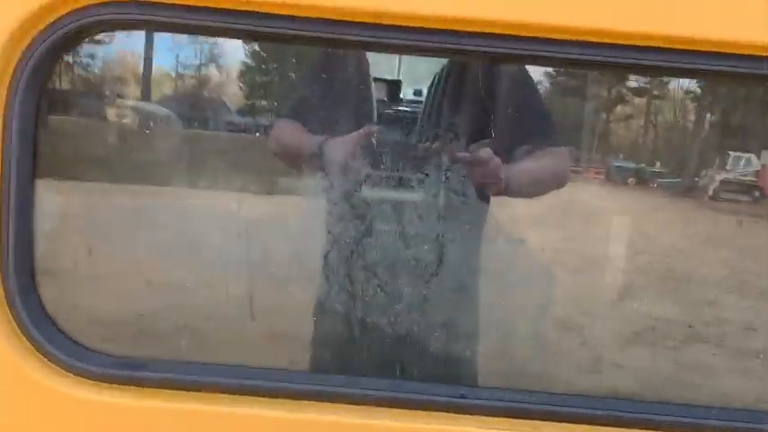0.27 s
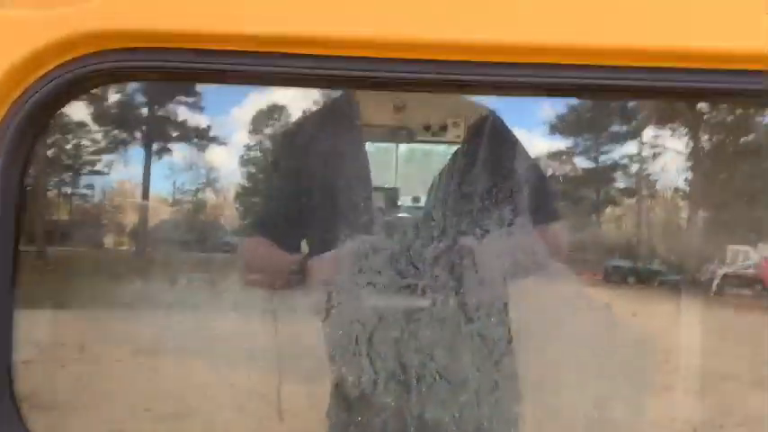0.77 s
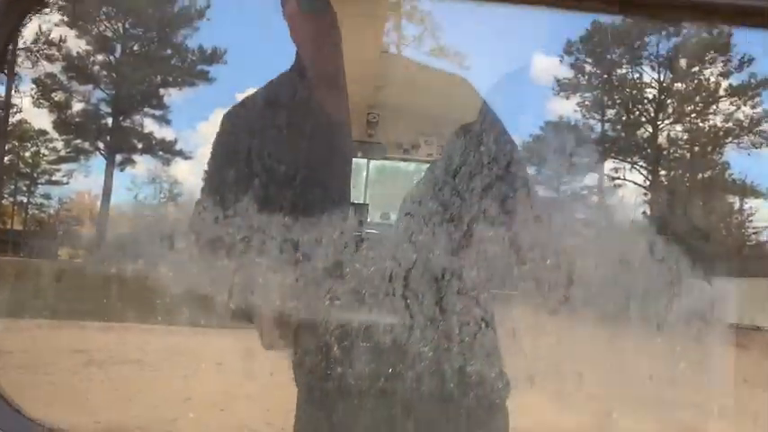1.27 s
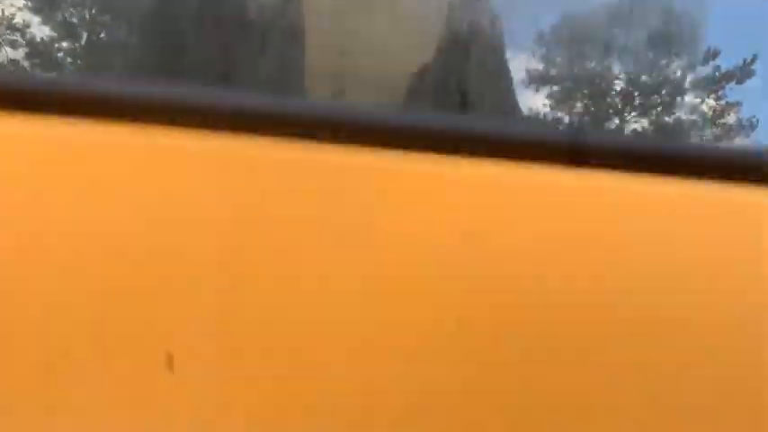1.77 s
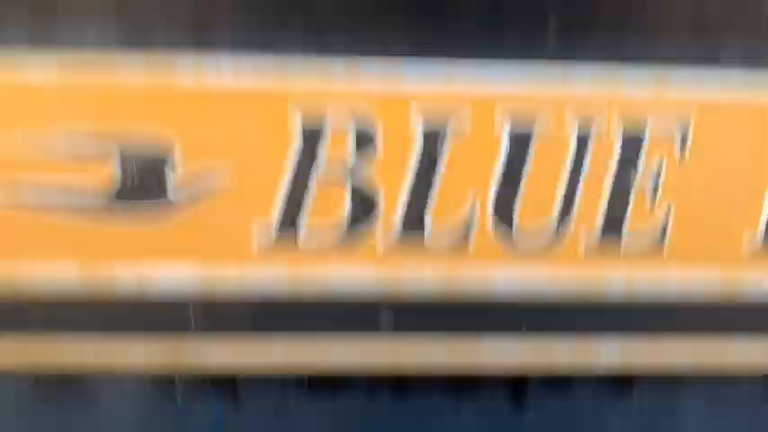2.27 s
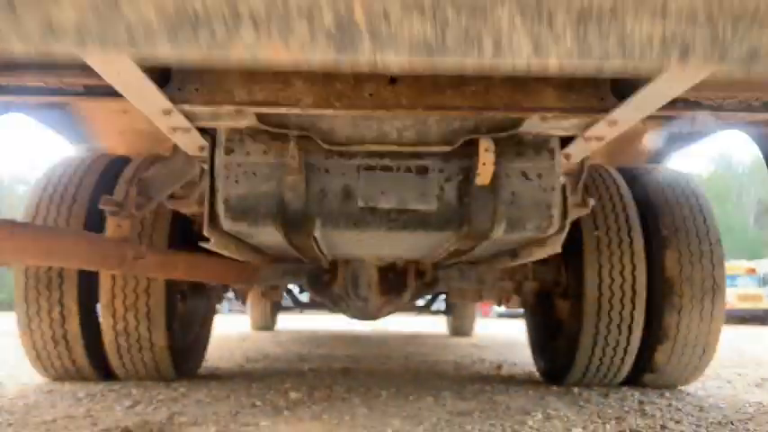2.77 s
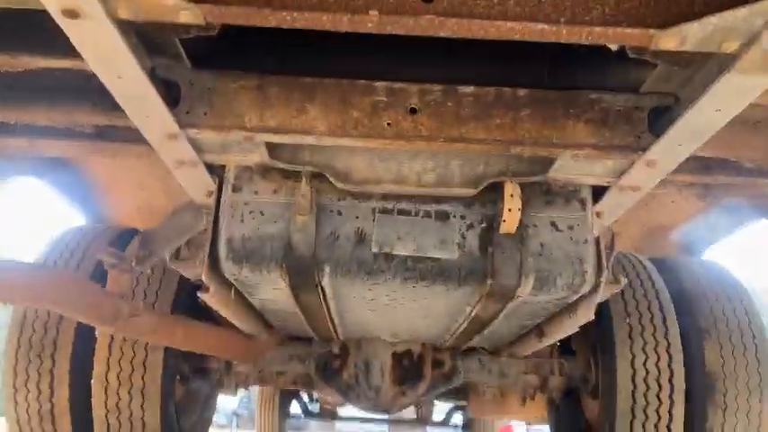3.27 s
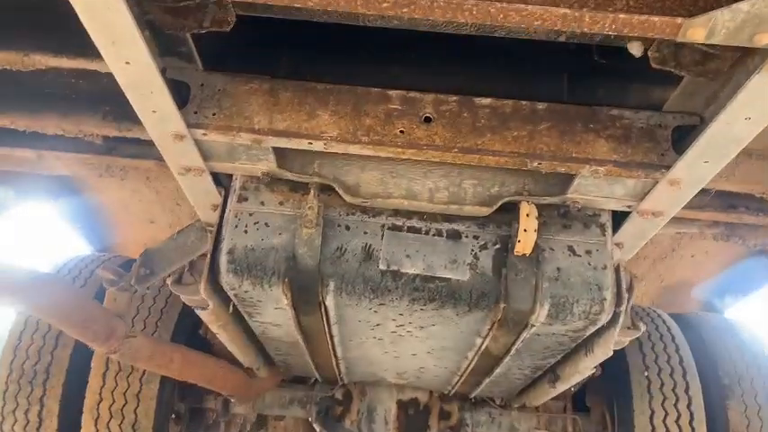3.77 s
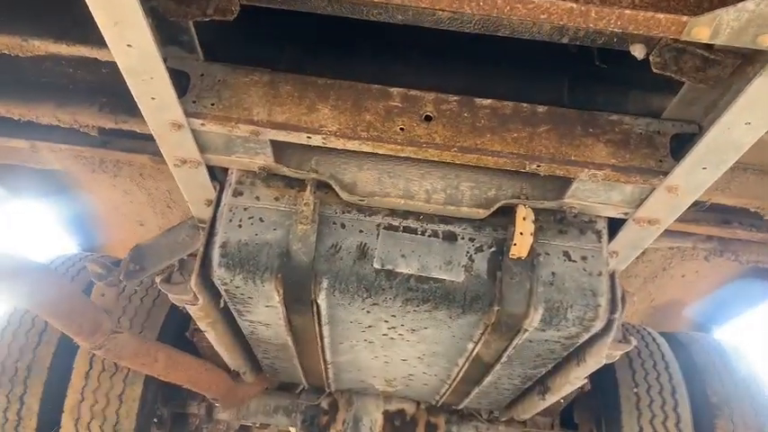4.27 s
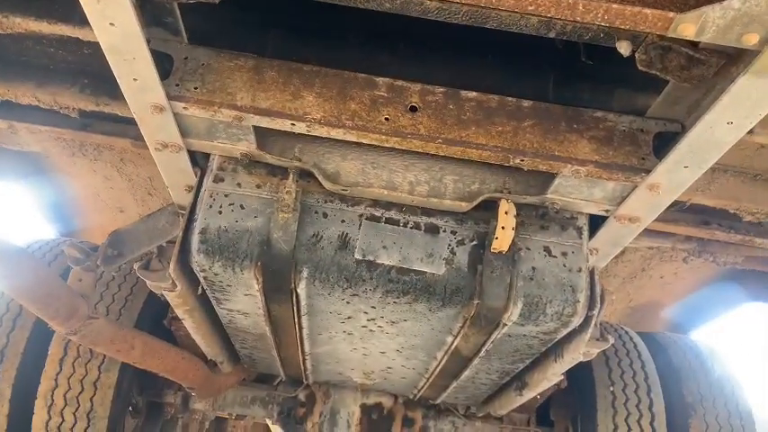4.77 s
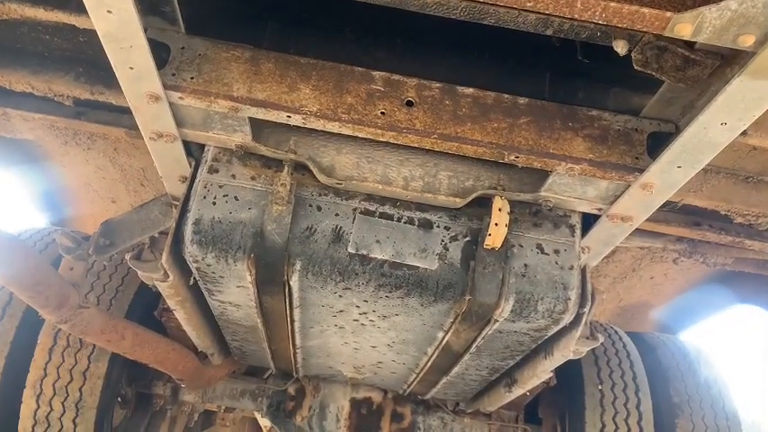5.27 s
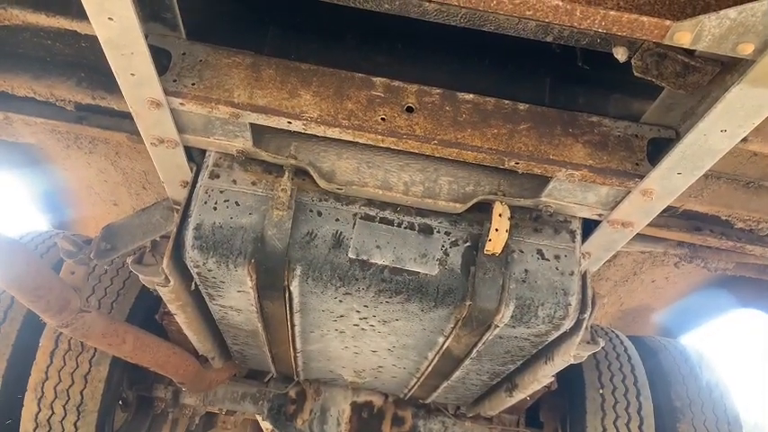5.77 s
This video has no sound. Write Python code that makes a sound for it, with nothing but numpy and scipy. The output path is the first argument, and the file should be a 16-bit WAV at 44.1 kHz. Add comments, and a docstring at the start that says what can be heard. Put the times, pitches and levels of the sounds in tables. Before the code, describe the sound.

Handling noise dominates at first: boxy knocks on a plastic case and quick finger slides right at the stereo microphone ports. It calms, with light clothing movement, before gravel crunches under shoes, bright brittle snaps over dusty hiss, strongest in the middle. The end is sparse, with weak taps, a faint creak or two and near stillness. A low engine murmurs far off in dry, open yard air.

```python
"""Gravel yard, phone in the hands

Outdoors on a gravel yard, someone shifts a phone in the hands, then crouches down by a parked vehicle.
Closest to the two microphone ports, fingers knock and rub the case: blows and stick-slip ring its modes.
Shoes grind grit (random clicks over hiss) and crack stones (short pitched snaps); cloth rustles, tones creak.
Far off, a low engine rumbles as narrow-band noise over faint yard air."""
import sys
import numpy as np
from scipy import signal
from scipy.fft import rfft, irfft, next_fast_len
from scipy.io import wavfile
from scipy.ndimage import uniform_filter1d

SR = 44100
rng = np.random.default_rng(int(sys.argv[2]) if len(sys.argv) > 2 else 0)


def materialize(psi):
    """Save the field psi as 16-bit PCM at rate SR to the path in sys.argv[1].

    A 1-D psi becomes a single channel; in a 2-D psi each row is a channel.
    """
    bounded = np.clip(np.atleast_2d(psi).T, -1, 1)
    quanta = np.round(bounded * 32767).astype(np.int16)
    wavfile.write(sys.argv[1], SR, quanta)


def level_to_linear(level):
    """Convert decibel levels to linear amplitude factors, elementwise."""
    exponent = np.asarray(level, float) / 20
    return 10 ** exponent


N = 265790
LENGTH = next_fast_len(N + SR // 4)  # room for filter tails
HZ = np.arange(LENGTH // 2 + 1) * SR / LENGTH + 1e-3

# Levels are relative. Mode and noise-band widths are those of one stage; two stages are used in a row.
# distant engine over time: (time [s], level [dB])
ENGINE_LEVEL = [(0, -41.5), (.35, -47), (.6, -39.5), (1.7, -46.5), (2.9, -43.5), (4.1, -42), (4.31, -37.5),
                (4.5, -43), (6.03, -44.5)]
# distant engine bands: (centre [Hz], width [Hz], level [dB])
ENGINE_BANDS = [(51.7, 18.7, 6), (37, 15, -3), (68, 61, -14.5)]
# spectrum of the open yard air: (frequency [Hz], density [dB per Hz])
YARD_SPECTRUM = [(55, -40), (90, -9.5), (162, -16.5), (394, -19), (644, -52), (1090, -46.5), (1790, -40),
                 (2290, -46.5), (8290, -47.5), (10800, -93.5)]
YARD_DB = -69
# cloth drawn over cloth: (start [s], end [s], centre [Hz], width [Hz], level [dB])
CLOTH_RUSTLES = [(1.74, 2.116, 1601, 218.5, -72), (1.968, 2.15, 2100, 160, -67.5),
                 (1.202, 1.3, 2300, 278, -62.5), (3.401, 3.43, 1440, 335, -55), (3.74, 3.8, 836, 520, -60),
                 (4.835, 4.9, 1130, 1400, -75), (2.03, 2.12, 1270, 100, -70)]
# short upward creaks: (start [s], end [s], start pitch [Hz], end pitch [Hz], level [dB])
RISING_CREAKS = [(4.69, 4.813, 545, 634, -62.5), (5.179, 5.317, 447, 691, -66.5),
                 (5.285, 5.323, 826, 880, -67)]
# clearest stones cracking under a shoe, and at 0.028 s the bright snap of a knock on the case: (time [s], level
# [dB], pitch [Hz])
STONE_CRACKS = [(0.028, -36.5, 3950), (1.447, -53.5, 1500), (1.755, -44, 2400), (1.756, -44.5, 930),
                (1.7815, -45, 4700), (2.582, -42.5, 1930), (2.7213, -30.5, 1290), (2.7227, -29.5, 6400),
                (2.735, -38, 1730), (2.7437, -37, 1570), (2.7762, -26.5, 6030), (2.7896, -30, 5040),
                (2.7985, -19, 3600), (2.8838, -33, 6420), (2.9138, -30, 3560), (2.9861, -34, 1780),
                (3.2244, -33, 3620), (3.404, -15, 4500), (3.477, -38, 5510), (3.497, -43, 4500),
                (3.5114, -45, 6040), (3.5415, -44, 3730), (3.555, -42, 4500), (3.606, -44, 4800),
                (3.586, -41, 5440), (3.623, -46.5, 4470), (3.653, -36, 4500), (3.6595, -38.5, 4700),
                (3.692, -28, 5000), (3.761, -35.5, 5460), (3.783, -41, 4500), (3.831, -37, 5860),
                (3.9437, -39.5, 5620), (3.9879, -42.5, 4020), (4.195, -57.5, 1596), (4.305, -53.5, 2710),
                (4.324, -58, 3410), (4.4415, -49, 3100), (4.8646, -36.5, 6170), (4.9351, -44, 4500)]
# shoes on grit over time: (time [s], level [dB], large grains [dB], middle grains [dB])
SHOE_GRIND = [(0, -101.5, 2, 7.5), (1.4, -72, 2, -1), (1.55, -85, 3, 2.5), (1.78, -65, 1, -7),
              (1.95, -72.5, 7.5, 1.5), (2.5, -62, -2.5, 0.5), (2.85, -59, 0.5, -1), (3.15, -68, 5.5, 6),
              (3.27, -74.5, 10, 2), (3.38, -80, 2, 4.5), (3.41, -69.5, -2, 4), (3.55, -67, -2.5, 3.5),
              (3.7, -66, -10, -1), (3.84, -56.5, -1.5, -7), (3.88, -90, 5, 15), (3.92, -62.5, 1, 5),
              (4.0, -76.5, -1.5, 2.5), (4.1, -81.5, 4.5, 2.5), (4.2, -89, -1, -1.5), (6.03, -100.5, 2, 3.5)]
# finer grain sizes: (centre [Hz], width [Hz], level [dB])
FINE_GRAINS = [(3300, 1100, -8), (4895, 3300, -2), (6580, 2300, -1)]
# larger grain sizes: (centre [Hz], width [Hz], level [dB])
LARGE_GRAINS = [(2400, 1600, -8.5), (1500, 1500, -2.5)]
# hands that never lie quite still: (time [s], level [dB])
GRIP_LEVEL = [(0, -43.5), (.18, -48), (.3, -54), (1.2, -51.5), (1.5, -67), (2.5, -67), (2.76, -55),
              (2.9, -62), (3.05, -54), (3.4, -60), (3.55, -56.5), (3.8, -54), (3.9, -60.5), (4.3, -70),
              (4.42, -76.5), (4.55, -64), (4.7, -75), (4.9, -64.5), (5.3, -68), (5.55, -82), (6.03, -92)]
# fingers sliding over the case, brightness and hiss relative to the level:
# (start [s], end [s], level [dB], brightness [dB], fine hiss [dB], where fastest [share of length])
FINGER_SLIDES = [(0, 0.04, -37, -3, -24, 0.24), (0.106, 0.146, -33, -11.5, -30, 0.39),
                 (0.408, 0.49, -31.5, -8.5, -28.5, 0.74), (0.484, 0.533, -45, 0, -17, 0.79),
                 (0.532, 0.545, -25, -12.5, -50, 0.46), (0.54, 0.624, -40.5, -5.5, -25, 0.47),
                 (0.634, 0.674, -49.5, -14, -26, 0.36), (0.675, 0.718, -40, -9.5, -24.5, 0.59),
                 (0.72, 0.8, -27.5, -7.5, -36.5, 0.54), (0.8, 0.9, -49.5, -7, -16.5, 0.5),
                 (0.875, 0.966, -58, -4.5, -40, 0.28), (0.955, 1.036, -34, -5, -34, 0.54),
                 (1.045, 1.114, -62, 3, -38, 0.55), (1.191, 1.343, -36, -9.5, -28.5, 0.75),
                 (1.347, 1.4, -57, -17, -20, 0.34), (5.033, 5.105, -56.5, -23, -46, 0.35)]
# knocks on the case, mode groups relative to the level:
# (time [s], level [dB], low pitch [Hz], middle modes [dB], upper modes [dB], thump [dB])
CASE_KNOCKS = [(0.009, -27.5, 330.8, -2, -5.5, 2.5), (0.028, -22.5, 352.6, -6.5, -5, -18),
               (0.111, -30.5, 380, 1.5, -10.5, -18), (0.131, 0, 392.2, -8, -19, -18),
               (0.311, -31, 304, -18, -50.5, 0), (0.416, -4, 344.5, -18, -17, -32.5),
               (0.452, -39.5, 403, -3, 4, 5), (0.479, -13.5, 441, -23, -18.5, -4),
               (0.488, -45.5, 392, -5, 11.5, -13), (0.502, -43, 400, -8, 13, -11.5),
               (0.638, -45.5, 400, -18, -1, -18), (0.666, -32, 380, -28, -12, -16),
               (0.726, -19, 439.6, -10.5, -4.5, -5), (0.846, -34, 312, -10.5, -30, -0.5),
               (0.969, -21, 311, -9.5, -26, -2), (1.336, -6.5, 402.7, -16, -11, -5.5),
               (1.587, -38.5, 355, -22, -31, 4), (1.666, -44.5, 347, -7.5, -26, -3),
               (1.69, -41, 316, -12, -25.5, 1), (1.88, -39.5, 335, -9.5, -30.5, -7),
               (2.125, -40, 356, -5, -18, -22.5), (2.721, -39.5, 565, -4, 1.5, -9),
               (3.125, -41.5, 333, -5.5, -11, -19), (3.303, -42.5, 366, -7, -24, -9.5),
               (3.34, -30.5, 378.5, -21, -27, -3.5), (3.478, -31.5, 375, -15.5, -26, -3.5),
               (3.897, -33, 402, -13, -25, -3.5), (4.206, -29, 380, -9.5, -17.5, -7.5),
               (4.34, -45, 332, 2.5, -6.5, -24), (4.345, -54, 327, 2.5, -2.5, -21),
               (4.491, -41.5, 380, -31, -25.5, -0.5), (4.773, -49.5, 516, -27, -18.5, -8.5),
               (4.832, -29.5, 388.3, -19, -19, -5), (4.971, -61, 399, 0, -4.5, -25),
               (4.989, -47, 303, -18.5, -24.5, -10), (5.054, -43, 380, -14.5, -27.5, 3),
               (5.07, -51, 380, -15, -22, -12.5), (5.6, -70.5, 400, 5.5, -2.5, -20.5)]
# low case modes: (centre [Hz], width [Hz], level [dB], lead of left port [rad])
CASE_LOW = [(380, 277, 8.5, 0.1), (484, 350, -0.5, 1.2), (239, 88, -2.5, 0.28)]
# middle case modes: (centre [Hz], width [Hz], level [dB], lead of left port [rad])
CASE_MIDDLE = [(790, 140, -2, 2.2), (1106, 440, -1.7, 2.2), (1186, 170, -6.5, 3.2)]
# upper case modes: (centre [Hz], width [Hz], level [dB], lead of left port [rad])
CASE_UPPER = [(1613, 460, 8.5, 5.1), (1970, 490, 3.5, 4.1), (2630, 740, -2.5, 1.9), (3180, 1500, -8.5, .5),
              (4500, 1800, -21, 0.8)]
# deep thump modes: (centre [Hz], width [Hz], level [dB], lead of left port [rad])
CASE_THUMP = [(61.7, 40, -8.5, 0.95), (140.3, 120, -4.5, 1.7)]
# colour difference of the microphone ports: (frequency [Hz], left minus right [dB])
PORT_DIFFERENCE = [(350, 1), (700, 6), (1400, 0), (4500, 1), (9000, -5), (12000, 0)]

TICK_DB, HARDER_DB_PER_DB = -18, 0.6  # nail slap against the upper modes; softer blows lose more
CONTACT_HZ, CONTACT_DB_PER_DB = 14000, 0.3  # a softer blow presses longer and reaches less high
KNOCK_PAN_DB, TILT_DB_PER_S = -1.3, 0.08  # left minus right at the start; the phone slowly tilts
RATTLE_DB, RATTLE_S = -19, 0.0092  # chatter in the grip after a knock, and its decay time
SLIDE_RISE_DB_PER_S, SLIDE_FALL_DB_PER_S = 1400.5, 903.5
SPEED_ARCH_DB = 6.5  # a slide is brightest where it is fastest
GRIP_BRIGHT_DB, GRIP_UPPER_DB = -16, -4  # still hands stir the middle modes little, the upper ones less
RUB_NARROW = 0.74  # light rubbing damps the case less than a blow: share of the mode widths
RUB_TILT_DB = -1  # added to each mode per octave
HIGH_HISS_DB = -80  # very faint high hiss, 9 to 12.5 kHz


def unit(x):
    """Scale to rms 1."""
    return x / np.sqrt(np.mean(x ** 2))


def curve(table, column):
    """One table column joined by straight lines in time."""
    rows = np.array(table)
    return np.interp(np.arange(N) / SR, rows[:, 0], rows[:, column])


def resonance(hz, width, axis=HZ):
    """Causal band-pass response, gain 1 at the centre."""
    return 1 / (1 + 1j * (axis / hz - hz / axis) * hz / width)


def colour(points):
    """Gain of (Hz, dB) points on a log-frequency axis."""
    hz, db = np.transpose(points)
    return level_to_linear(np.interp(np.log(HZ), np.log(hz), db))


def through(x, response):
    """Filter in the frequency domain."""
    return irfft(rfft(x, LENGTH) * response, LENGTH)[..., :N]


def sides(pan_db):
    """Left and right gains of a level difference."""
    return level_to_linear(np.array([pan_db, -pan_db]) / 2)


def clumps(per_s, depth_db):
    """A gain that wanders at random."""
    k = int(SR / per_s)
    steps = np.repeat(rng.standard_normal(N // k + 1), k)
    return level_to_linear(depth_db * uniform_filter1d(steps, k)[:N])


def grains(per_s, spread_db, channels):
    """Random clicks: many small, a few large."""
    hit = rng.random((channels, N)) < per_s / SR
    size = np.minimum(rng.exponential(size=(channels, N)), 3.5)
    return hit * level_to_linear(spread_db * size) * rng.standard_normal((channels, N))


def case(modes, axis=HZ, tune=1):
    """Steep modes that build up over a few cycles; each port sits at another phase of each mode."""
    side = np.array([[1], [-1]])
    # soft skin cannot push far above these modes
    soft = 1 / (1 + 1j * axis / (1.4 * max(modes)[0])) ** 2
    total = 0
    for k, (hz, width, db, lead) in enumerate(modes):
        ring = resonance(tune * hz, width, axis) ** 2
        total = total + (-1) ** k * level_to_linear(db) * ring * np.exp(0.5j * lead * side)
    return soft * total


def slides(column):
    """Gain of all slides: quick rise, hold, quick fall; a treble column adds its dB and arches with speed."""
    t, power = np.arange(0, N + 32, 32) / SR, 0
    for row in FINGER_SLIDES:
        start, end, level_db, fastest = row[0], row[1], row[2], row[5]
        rise_db = SLIDE_RISE_DB_PER_S * np.maximum(start - t, 0)
        fall_db = SLIDE_FALL_DB_PER_S * np.maximum(t - end, 0)
        progress = np.clip((t - start) / (end - start), 0, 1)
        slow = (2 * progress - 2 * fastest) ** 2
        treble_db = row[column] - SPEED_ARCH_DB * slow if column else 0
        power = power + level_to_linear(2 * (level_db - rise_db - fall_db + treble_db))
    return np.interp(np.arange(N) / SR, t, np.sqrt(power))


def rattle(column):
    """Gain of the chatter that dies away after each knock; a column may add its dB."""
    starts = np.zeros(N)
    for row in CASE_KNOCKS:
        starts[int(row[0] * SR)] = level_to_linear(row[1] + RATTLE_DB + (row[column] if column else 0))
    decay = signal.lfilter([1], [1, -np.exp(-1 / (RATTLE_S * SR))], starts)
    once = uniform_filter1d(decay, size=120, origin=59)  # smoothed twice for a soft start
    return uniform_filter1d(once, size=120, origin=59)


def yard_air():
    """Faint air of the yard: wide coloured noise that swells and thins at random."""
    both, apart = rng.standard_normal((2, N))
    noise = (both + 1.1 * apart * np.array([[1], [-1]])) * clumps(30, 3)
    return level_to_linear(YARD_DB) * unit(through(noise, colour(YARD_SPECTRUM))) * sides(1.7)[:, None]


def distant_engine():
    """A wavering engine note: noise in narrow low bands, mostly alike in both ports."""
    both, apart = rng.standard_normal((2, N))
    note = sum(level_to_linear(db) * resonance(hz, width) ** 2 for hz, width, db in ENGINE_BANDS)
    engine = unit(through(both + 0.51 * apart * np.array([[1], [-1]]), note))
    return level_to_linear(curve(ENGINE_LEVEL, column=1)) * engine * sides(1.3)[:, None]


def rustles():
    """Cloth drawn over cloth: grainy noise in narrow bands, swelling and fading."""
    out = np.zeros((2, N))
    axis = np.arange(SR // 4 + 1) * 2 + 1e-3
    for start, end, hz, width, db in CLOTH_RUSTLES:
        count, first = int((end - start) * SR), int(start * SR)
        both, *each = rng.standard_normal((3, SR // 2))
        noise = both + 0.38 * np.array(each)
        band = unit(irfft(rfft(noise) * resonance(hz, width, axis) ** 2))
        out[:, first:first + count] += level_to_linear(db) * np.sqrt(np.hanning(count)) * band[:, :count]
    return out * clumps(40, 4)


def creaks():
    """A rough tone sliding upward: a sine whose strength wavers at random."""
    out = np.zeros(N)
    for start, end, hz0, hz1, db in RISING_CREAKS:
        count, first = int((end - start) * SR), int(start * SR)
        phase = 2 * np.pi * np.cumsum(np.linspace(hz0, hz1, count)) / SR
        rough = 1 + 6 * uniform_filter1d(rng.standard_normal(count), size=150)
        out[first:first + count] += level_to_linear(db) * np.hanning(count) * rough * np.sin(phase)
    return out


def cracks(cycles=1.65, snap_s=0.00064, tail_s=0.0086, tail_db=-18, white_db=-3.5, spread=0.92, wider=0.13):
    """A snap of a cycle or two at its own pitch, broader when louder, then a rattle of grit and echo."""
    out, t = np.zeros((2, N + SR)), np.arange(SR // 10) / SR
    axis = np.arange(len(t) // 2 + 1) * 10 + 1e-3
    for s, level_db, hz in STONE_CRACKS:
        both, *each = rng.standard_normal((3, len(t)))
        fade = level_to_linear(white_db) * np.exp(-t / snap_s) + level_to_linear(tail_db) * np.exp(-t / tail_s)
        grit = (both + np.array(each)) * fade
        snap = np.sin(2 * np.pi * hz * t) * np.exp(-t * hz / cycles)
        width = spread * level_to_linear(wider * (level_db + 40.5)) * hz
        sound = irfft(rfft(snap + grit) * resonance(hz, width, axis))
        out[:, int(s * SR):int(s * SR) + len(t)] += level_to_linear(level_db) * sound
    return through(out[:, :N], 1 / (1 + (HZ / 7500) ** 12))


def grind():
    """Shoes tick grains of a few sizes over a hiss of dust and cloth; sliding fingers add the same fine hiss."""
    # strength of the ticks over the steady hiss: up as the crouching weight comes on, fullest at the end
    weight = np.interp(np.arange(N) / SR, [2.6, 2.72, 4.0, 4.2], [0.38, 0.65, 0.49, 1.0])
    broad = weight * unit(grains(120, 3.5, channels=1))

    def grit(hz, width):
        """One grain size: ticks and hiss through its band."""
        ticks = weight * unit(grains(200, 3.7, channels=1) + 0.6 * grains(500, 3.5, channels=2))
        mixed = ticks + 0.8 * broad + 0.55 * rng.standard_normal((2, N))
        return unit(through(mixed * clumps(35, 2.5), resonance(hz, width) ** 2))

    middle_db = curve(SHOE_GRIND, column=3)  # only for the grains below 6000 Hz
    fine = sum(level_to_linear(db + (hz < 6000) * middle_db) * grit(hz, width) for hz, width, db in FINE_GRAINS)
    large = sum(level_to_linear(db) * grit(hz, width) for hz, width, db in LARGE_GRAINS)
    shoes = level_to_linear(curve(SHOE_GRIND, column=1))
    fine_level = level_to_linear(0.64) * np.hypot(shoes, slides(column=4))
    return fine_level * fine + shoes * level_to_linear(curve(SHOE_GRIND, column=2)) * large


def rub():
    """Skin sticks and slips in dense small jerks; each mode of the case takes them in its own clumps."""
    jerks = unit(grains(600, 3.6, channels=1) + 0.86 * grains(1800, 4.1, channels=2)) * clumps(90, 1.4)

    def rubbed(modes):
        """One group of case modes stirred by the jerks."""
        total = 0
        for hz, width, db, lead in modes:
            mode = (hz, RUB_NARROW * width, db + RUB_TILT_DB * np.log2(hz), lead)
            total = total + through(jerks * clumps(45, 4.3), case([mode]))
        return unit(total)

    grip = level_to_linear(curve(GRIP_LEVEL, column=1))
    level = np.hypot(slides(column=0), grip) + rattle(column=0)
    moving, still = slides(column=3), level_to_linear(GRIP_BRIGHT_DB) * grip
    middle_level = np.hypot(moving + rattle(column=3), still)
    upper_level = np.hypot(moving + rattle(column=4), level_to_linear(GRIP_UPPER_DB) * still)
    top_level = moving ** 2 / level  # only fast sliding reaches the highest modes
    body = level * (rubbed(CASE_LOW) + level_to_linear(-4.5) * rubbed(CASE_THUMP))
    return (body + middle_level * rubbed(CASE_MIDDLE) + level_to_linear(-2.5) * upper_level * rubbed(CASE_UPPER[:3])
            + level_to_linear(-6.5) * top_level * rubbed(CASE_UPPER[3:]))


def knocks(grip=0.12, rebound=0.35):
    """Each blow and its rebound ring the case; the grip detunes it, the low modes and thump answer last."""
    size = SR // 5
    axis, out = np.arange(size // 2 + 1) * SR / size + 1e-3, np.zeros((2, N))
    for s, level_db, hz, middle_db, upper_db, thump_db in CASE_KNOCKS:
        a, b, c = rng.standard_normal(3)
        hard_db = level_db + upper_db
        contact_hz = CONTACT_HZ * level_to_linear(CONTACT_DB_PER_DB * hard_db)
        blow = 1 + rebound * np.exp(-2j * np.pi * axis * 0.0028 * (1 + 0.28 * c))
        blow = blow / (1 + 1j * axis / contact_hz) ** 4
        tick_db = TICK_DB + upper_db + HARDER_DB_PER_DB * hard_db
        # (modes, share [dB], tuning factor, delay [s])
        parts = [(CASE_LOW, 0, hz / CASE_LOW[0][0], 0.0022),
                 (CASE_MIDDLE, middle_db, 1 + grip * a, 0),
                 (CASE_UPPER, upper_db, 1 + grip * b, 0),
                 (CASE_THUMP, thump_db, 1, 0.004),
                 ([(4800, 12000, 0, 0.8)], tick_db, 1 + grip * b, 0)]
        pan = sides(KNOCK_PAN_DB + TILT_DB_PER_S * s)[:, None]
        for modes, share_db, tune, late_s in parts:
            # rolled so that what the port phases put ahead of the blow stays ahead of it
            ring = np.roll(irfft(blow * case(modes, axis, tune)), size // 4, axis=1)
            peak = np.abs(ring.mean(axis=0)).max()
            ring = ring * level_to_linear(level_db + share_db) / peak * pan
            start = int((s + late_s) * SR) - size // 4
            out[:, max(start, 0):start + size] += ring[:, max(-start, 0):]
    return out


def scene():
    """All sources at the two microphone ports, from the far background to the case in the hands."""
    far = yard_air() + distant_engine()
    near = rustles() + creaks() + cracks() + grind()
    return far + near + rub() + knocks()


def low_pass(x):
    """Removes everything above the highest recorded frequency."""
    return signal.sosfilt(signal.butter(12, 12900, fs=SR, output="sos"), x)


def record(dry):
    """The ports differ in colour and roll off the top; a trace of high hiss joins, loud knocks are rounded."""
    goes_on = np.pad(dry, ((0, 0), (0, LENGTH - N)), mode="reflect")  # no sudden stop in the filter
    ports = np.sqrt(colour(PORT_DIFFERENCE)) ** np.array([[1], [-1]])
    dull = through(goes_on, ports / (1 + (HZ / 7900) ** 12))
    hiss_band = resonance(10800, 3600) ** 2 / (1 + (HZ / 12600) ** 24)
    high_hiss = level_to_linear(HIGH_HISS_DB) * through(rng.standard_normal((2, N)), hiss_band)
    rounded = 0.95 * np.tanh(1.1 * (dull + high_hiss))
    return low_pass(rounded)


dry = scene()
out = record(dry)
materialize(out)
```